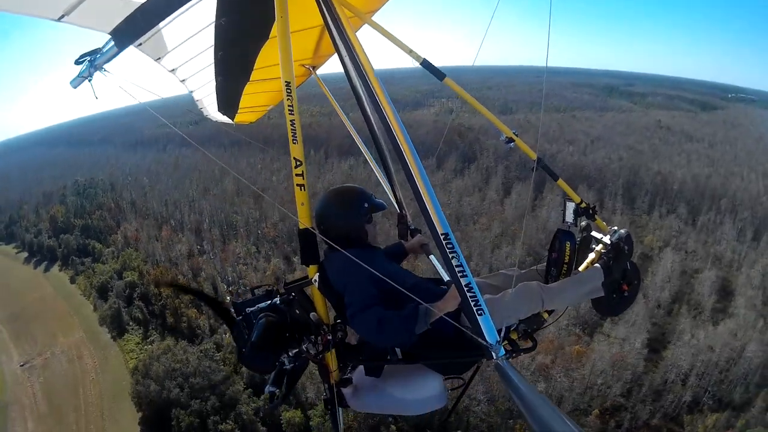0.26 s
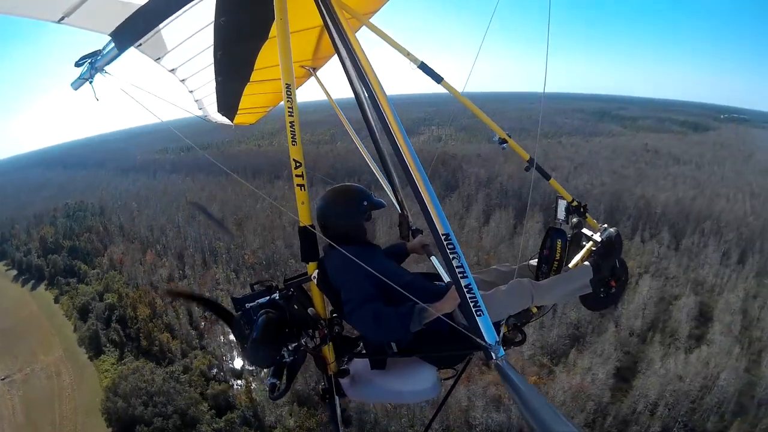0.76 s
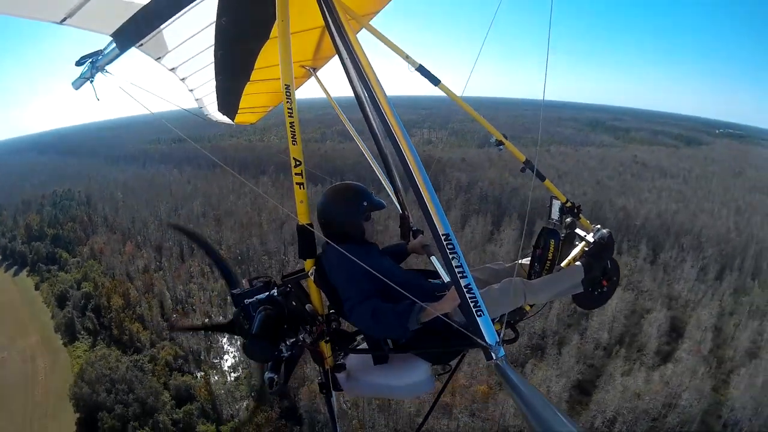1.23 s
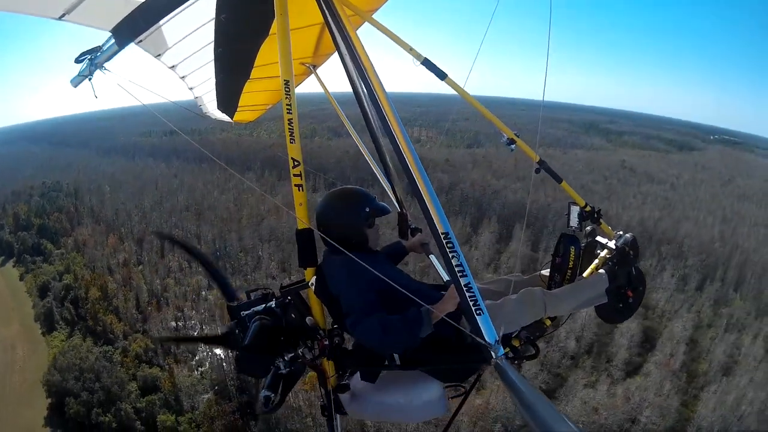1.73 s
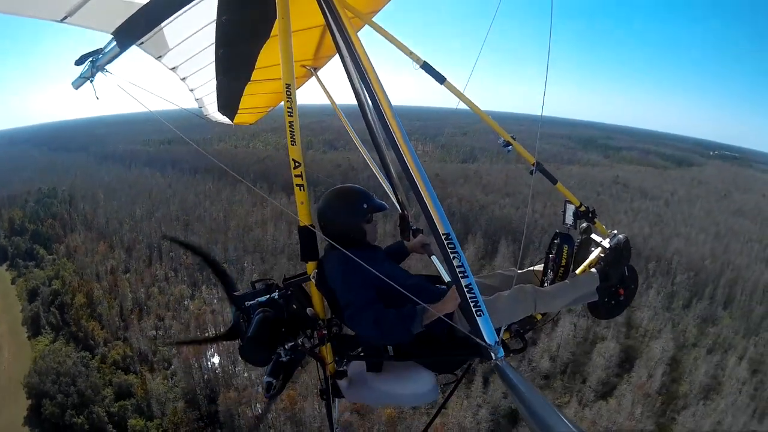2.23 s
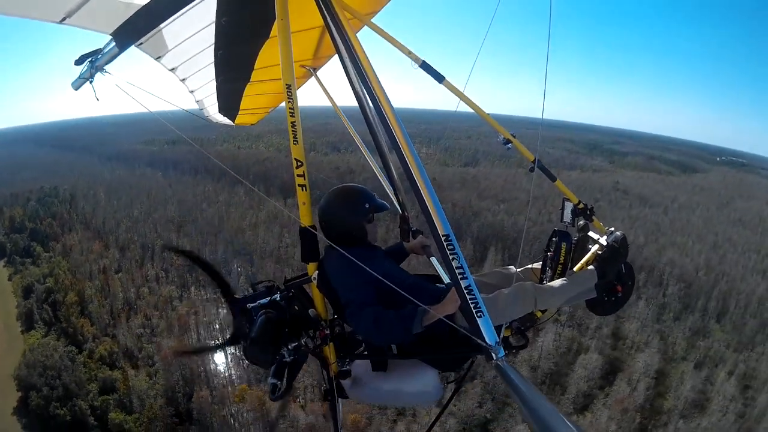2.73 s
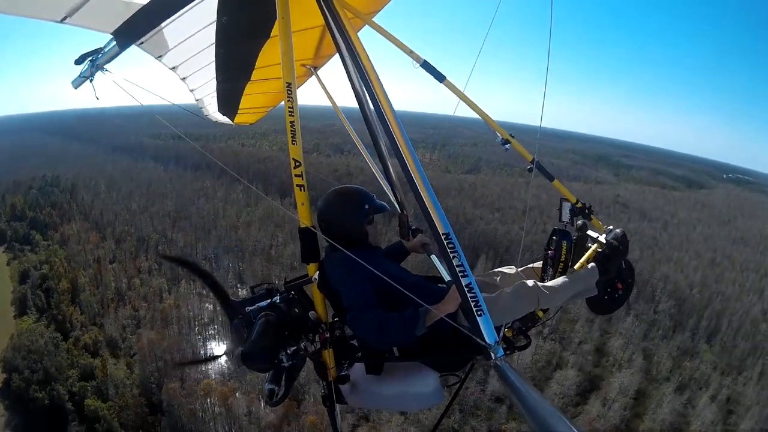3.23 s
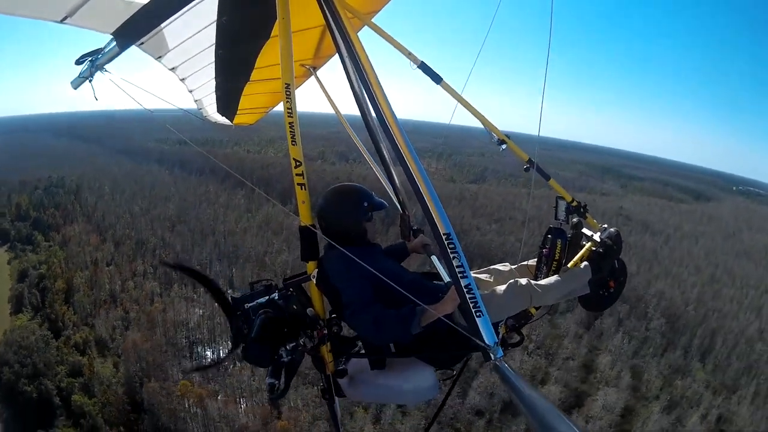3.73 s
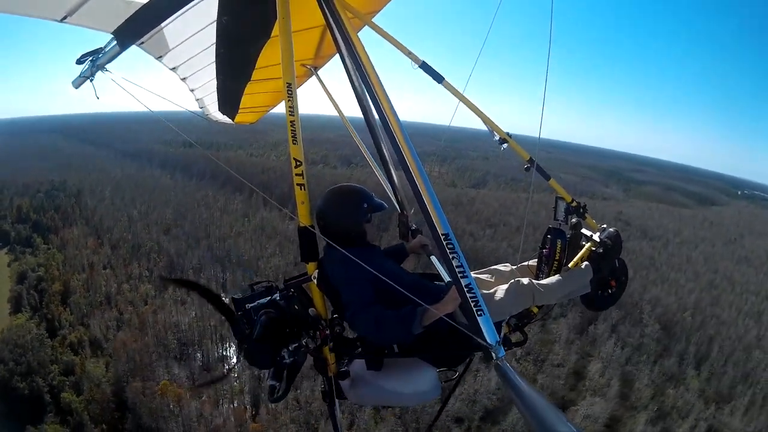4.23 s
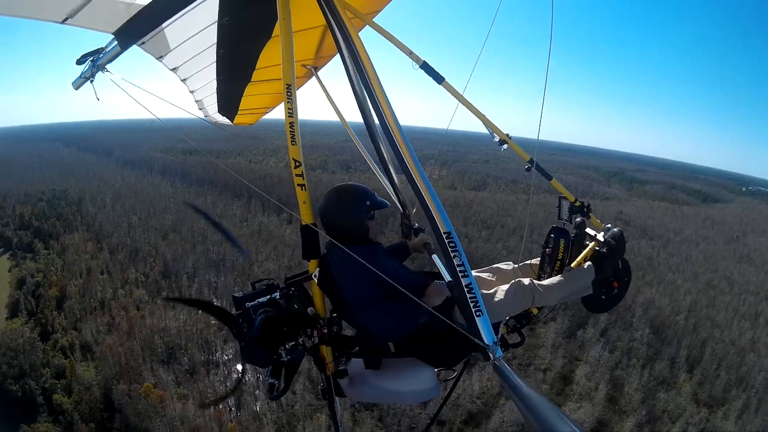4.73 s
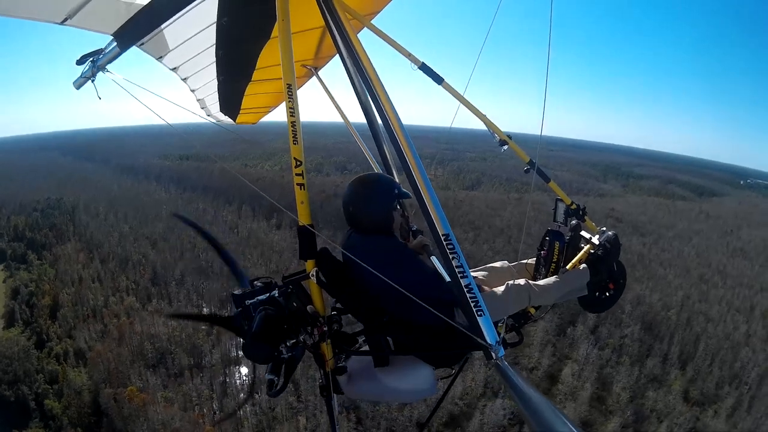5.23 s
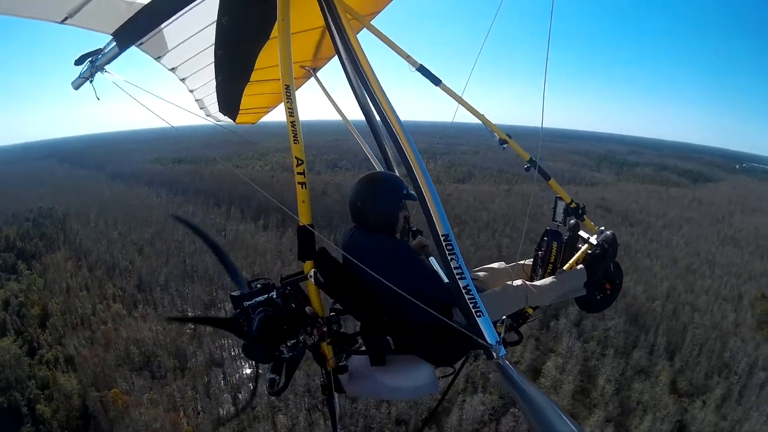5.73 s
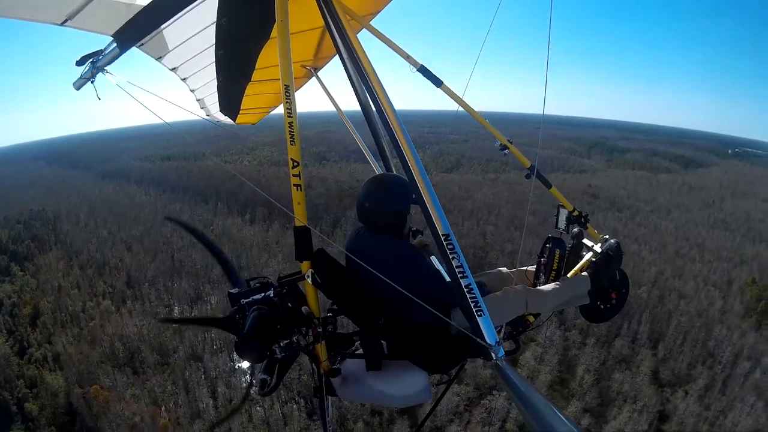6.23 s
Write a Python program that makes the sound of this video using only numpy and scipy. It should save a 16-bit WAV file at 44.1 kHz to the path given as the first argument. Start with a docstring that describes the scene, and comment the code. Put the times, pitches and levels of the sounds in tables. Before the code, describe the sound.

Aboard an open ultralight in cruise, the pusher propeller hums deep and steady with a buzzing engine drone and faint whine. Dense, gusty wind roars over an exposed microphone on the wing, flattening its loudest peaks, with a brief rising hoot and a few pops. A loose fitting nearby ticks and crackles irregularly throughout. The wind eases slightly towards the end.

```python
"""Out on the wing of a weight-shift ultralight in cruise, with the microphone open to the airstream.
The pusher propeller hums as blade-rate partials; the faster engine drones and whines as shaft harmonics.
Blades and engine add a throbbing rush; eddies on the port are shaped noise with gusts, pops and one hoot.
A loose fitting close by ticks and crackles: impulses make noise bursts that ring its resonances.
The input flattens the loud peaks, a faint steady noise floor lies under them, and the top rolls off."""
import sys
import numpy as np
from scipy import signal
from scipy.fft import rfft, irfft
from scipy.io import wavfile

SR = 44100
rng = np.random.default_rng(int(sys.argv[2]) if len(sys.argv) > 2 else 0)


def generate_wav(signal):
    """Clip the signal to [-1, 1] and save it as 16-bit WAV at the path in sys.argv[1]."""
    frames = np.transpose(np.atleast_2d(signal))
    scaled = np.clip(frames, -1, 1) * 32767
    pcm = np.round(scaled).astype(np.int16)
    wavfile.write(sys.argv[1], SR, pcm)


N = 285768

# weaker propeller overtones: multiple of the blade rate, level/dB
BLADE_OVERTONES = [(3, -27.5), (4, -40), (5, -39)]
# exhaust drone, then mechanical whine: multiple of the shaft rate, level/dB before flutter and sway
ENGINE_ORDERS = [(1, -16), (2, -17), (3, -35), (4, -38.5), (6, -52), (10, -51.5), (11, -42), (12, -47),
                 (13, -45), (14, -50.5), (15, -47.5), (16, -54.5), (17, -49.5), (20, -60), (21, -54.5),
                 (49, -67), (50, -63), (52, -73)]
# how the tones carry as the airframe sways: t/s, blade tone level/dB, octave level/dB, whine lift/dB
SWAY = [(0, -11, -6, -4), (0.6, -11.5, -14, 1), (0.85, -7, -15, 3.5), (1.5, -9.5, -8, 4),
        (2.4, -8.5, -17.5, 5), (3.4, -8.5, -12.5, 1.5), (4.7, -7.5, -10, 5.5), (5.3, -9.5, -9.5, 3),
        (6.48, -10.5, -14.5, 3.5)]
# colour of the blade and engine rush: f/Hz, relative density level/dB
RUSH_COLOUR = [(500, -2.5), (1200, 0), (1850, 1.5), (2500, -13.5), (3300, -9.5), (3800, -20), (5400, -19.5),
               (7800, -38), (10000, -29.5), (10800, -37.5), (11700, -26.5), (13500, -48.5), (16000, -55.5)]
# gusts as smooth swells: t/s at the height, full length/s, deep roar lift/dB, upper roar lift/dB
GUSTS = [(0.2, .45, 1, 3.5), (0.618, .4, 0, 1.5), (1.37, .3, 3, 0), (1.68, .25, -0.5, 1.5),
         (1.968, 0.2, 4.5, -0.5), (2.42, 0.23, 1.5, -2), (2.715, 0.36, .5, 5.5), (3.095, 0.58, 0.6, 5),
         (4.33, .25, 1.5, -1), (4.65, 0.14, 1.5, 2), (5.03, 0.79, 1.8, 1.5)]
# colour of the deep buffeting on the port: f/Hz, relative density level/dB
BUFFET_COLOUR = [(8, -20), (20, -13.5), (40, -11), (70, -3), (130, 0), (200, 2.5), (260, -3), (350, -10),
                 (550, -21), (800, -26.5), (1300, -34.5), (3000, -47), (8000, -63.5)]
# colour of the smaller eddies, the hollow upper roar: f/Hz, relative density level/dB
SMALL_EDDY_COLOUR = [(60, -31), (180, -7), (280, 5), (480, -3.5), (750, -10.5), (1200, -22.5), (3000, -42),
                     (8000, -69)]
# eddies that burst right on the port: t/s, relative level/dB
POPS = [(0.238, -14), (0.497, -18), (1.9415, -7), (4.646, -14), (5.958, -13)]
# colour of those bursts: f/Hz, relative density level/dB
POP_COLOUR = [(200, -14), (700, 10), (1500, 9), (3000, -14), (7000, -22), (12000, -33), (16000, -30)]
# ticks of the loose fitting: t/s, strike level/dB before the resonances
TICKS = [(0.023, -10), (0.076, -19), (0.6828, -15), (1.0269, -4.5), (1.334, -17), (1.381, -15),
         (1.557, -11.5), (1.7317, -13), (1.8327, -13.5), (1.9137, -10.5), (2.4927, -15), (2.772, -13),
         (3.7142, -13), (4.5291, -15.5), (4.5989, -15), (4.63, -9), (4.7462, -9.5), (5.009, -7.5),
         (5.458, -14), (5.5754, -17), (5.6241, -17), (5.724, -12.5), (5.8272, -19), (5.96, -10),
         (6.0756, -13)]
# resonances of the fitting: f/Hz, width/Hz, level/dB
FITTING_MODES = [(1980, 770, -2), (4080, 380, 1), (5400, 1000, -9.5), (8370, 1100, -20), (9720, 700, -16),
                 (12300, 2000, -33)]
# colour of the faint steady noise floor: f/Hz, relative density level/dB
FLOOR_COLOUR = [(1000, -10.5), (4000, 3), (8000, -6.5), (12000, -8), (16000, -26)]

BLADE_HZ, SHAFT_HZ = 97.9, 137.72       # mean blade-passing and engine shaft rates
# shares of the whine's swing in dB
WHISTLE_FOLLOWS, RUSH_FOLLOWS = 0.6, 0.15
# the airstream eases steadily, the deep and the hollow upper roar each at its own rate
ROAR_EASE_DB_PER_S, HOLLOW_EASE_DB_PER_S = 0.53, 0.9
HOOT_S, HOOT_LENGTH_S, HOOT_DB = 0.485, 0.13, -3.5      # centre, full length, level at the height
HOOT_HZ, HOOT_RISE_HZ_PER_S = 285.7, 1400               # pitch at the centre, and its climb
SHAKE_REST_DB, SHAKE_DB_PER_GUST_DB = -3.5, 3.5
SHAKE_LENGTH_S, SHAKE_NEAR_TICK_DB, SHAKE_FOLLOWS_TICK = 0.27, 6.5, 0.49   # last: dB per dB of tick
OVERLOAD, CUTOFF_HZ = 0.71, 15700       # input ceiling as amplitude, top edge of the recorder


def propeller(passes, blade_db=-0.05, octave_db=0.34, blade_flutter_db=0.5, octave_flutter_db=0.9,
              flutter_hz=4):
    """Each passing blade sends a pressure pulse: a deep hum and octave, both unsteady in the rough air."""
    blade_sway_db, octave_sway_db, _ = in_time(SWAY)
    blade_level_db = blade_sway_db + blade_db + blade_flutter_db * drift(flutter_hz)
    octave_level_db = octave_sway_db + octave_db + octave_flutter_db * drift(flutter_hz)
    partials = [(1, blade_level_db), (2, octave_level_db)] + list(BLADE_OVERTONES)
    return sum(from_db(db) * tone(round(k) * passes, waver=0.04, waver_hz=5) for k, db in partials)


def engine(turns, flutter_db=0.85, waver=0.2, waver_per_order=0.011, whistle_db=-0.5):
    """Shaft harmonics: the exhaust drones on the lowest, moving metal whines on the high ones."""
    *_, whine_db = in_time(SWAY)
    top_whistle_db = whistle_db + WHISTLE_FOLLOWS * whine_db
    out = np.zeros(N)
    for k, db in ENGINE_ORDERS:
        if k < 10:
            carry_db = 0
        elif k < 40:
            carry_db = whine_db
        else:
            carry_db = top_whistle_db
        # short waves are shaken more on their way through the air
        partial = tone(round(k) * turns, waver + waver_per_order * k, waver_hz=13.7)
        out += from_db(db + carry_db + flutter_db * drift(13)) * partial
    return out


def rush(turns, rush_db=-28.5, throb=0.063):
    """Broad noise of blades and engine, swelling once a shaft turn and partly carrying as the whine does."""
    *_, whine_db = in_time(SWAY)
    swell = 1 + throb * np.cos(2 * np.pi * turns)
    return from_db(rush_db + RUSH_FOLLOWS * whine_db) * swell * coloured_noise(RUSH_COLOUR)


def wind(gust_db, hollow_db, wind_db=-4.5, small_db=-16, small_depth=0.29, pop_db=-1, pop_s=0.0037):
    """Eddies break on the microphone port as a deep and a hollow roar; a few burst with a sharp pop."""
    roar = from_db(wind_db + gust_db) * coloured_noise(BUFFET_COLOUR)
    small_level_db = small_db + hollow_db + small_depth * gust_db
    small_eddies = from_db(small_level_db) * coloured_noise(SMALL_EDDY_COLOUR)
    pops = from_db(pop_db) * die_away(strikes(POPS), pop_s) * coloured_noise(POP_COLOUR)
    return roar + small_eddies + pops + hoot()


def hoot():
    """One gust sheds vortices across the port at a rising rate, swelling and fading as it climbs."""
    from_centre_s = np.clip(seconds() - HOOT_S, -HOOT_LENGTH_S / 2, HOOT_LENGTH_S / 2)
    pitch_hz = HOOT_HZ + HOOT_RISE_HZ_PER_S * from_centre_s
    whistle = tone(np.cumsum(pitch_hz) / SR, waver=0.45, waver_hz=23)
    return from_db(HOOT_DB) * hump(HOOT_S, HOOT_LENGTH_S) * whistle


def airstream(unrest_db=0.5, unrest_hz=3):
    """Deep and upper roar lifts in dB: steady easing and gusts, with random unrest in the deep one."""
    t = seconds()
    deep_db = sum(db * hump(s, length) for s, length, db, _ in GUSTS) - ROAR_EASE_DB_PER_S * t
    hollow_db = sum(db * hump(s, length) for s, length, _, db in GUSTS) - HOLLOW_EASE_DB_PER_S * t
    return deep_db + unrest_db * drift(unrest_hz), hollow_db


def fitting(gust_db, chatter_s=0.0034, bounce_s=0.014, bounce_db=-8, faint_per_s=85, faint_db=-20):
    """Ticks and their softer bounces chatter for milliseconds and ring; shaking adds a fine crackle."""
    crackle_hits = rng.random(N) < faint_per_s / SR
    crackle_db = faint_db + rng.uniform(-11.6, 4.72, N)
    faint = crackle_hits * shaking(gust_db) * from_db(crackle_db)
    # each bounce trails its tick by 0.5 to 1.5 times bounce_s
    bounces = [(s + bounce_s * (0.5 + rng.random()), db + bounce_db) for s, db in TICKS]
    loud = strikes(TICKS) + strikes(bounces)
    envelope = die_away(loud, chatter_s) + die_away(faint, decay_s=0.0013)
    chatter = envelope * rng.standard_normal(N)
    out = np.zeros(N)
    for k, (hz, width_hz, db) in enumerate(FITTING_MODES):
        out += (-1) ** k * from_db(db) * resonance(chatter, hz, width_hz)   # alternate polarity
    return out


def shaking(gust_db):
    """How hard the fitting is shaken, as a gain: more around strong ticks and in gusts."""
    near_ticks = np.zeros(N)
    for s, db in TICKS:
        near_db = SHAKE_NEAR_TICK_DB + SHAKE_FOLLOWS_TICK * db
        near_ticks += from_db(near_db) ** 2 * hump(s, SHAKE_LENGTH_S)
    in_gusts = from_db(SHAKE_REST_DB + SHAKE_DB_PER_GUST_DB * gust_db) ** 2
    return np.sqrt(near_ticks + in_gusts)


def tone(turns, waver, waver_hz):
    """A partial of rms 1; turbulent air on its way shakes its phase by waver radians rms."""
    start = rng.random()
    return np.sqrt(2) * np.sin(2 * np.pi * (turns + start) + waver * drift(waver_hz))


def drift(rate_hz):
    """Smooth random wandering of spread 1: noise through a two-pole low-pass, at a 40th of the rate."""
    pole = np.exp(-2 * np.pi * rate_hz * 40 / SR)
    noise = rng.standard_normal(N // 40 + 2002)
    slow = signal.lfilter([1], [1, -2 * pole, pole * pole], noise)[2000:]   # drop the settling
    return np.interp(np.arange(N) / 40, np.arange(len(slow)), rms_one(slow))


def coloured_noise(spectrum):
    """Noise of rms 1 with the given spectrum, joined in dB over log frequency."""
    hz, db = np.transpose(spectrum)
    bins_hz = np.maximum(np.fft.rfftfreq(N, 1 / SR), 1)
    gain = from_db(np.interp(np.log(bins_hz), np.log(hz), db))
    return rms_one(irfft(rfft(rng.standard_normal(N)) * gain, N))


def resonance(x, hz, width_hz):
    """Two-pole resonance with gain 1 on top."""
    r = np.exp(-np.pi * width_hz / SR)
    feedback = [1, -2 * r * np.cos(2 * np.pi * hz / SR), r * r]
    return signal.lfilter(np.array([1, 0, -1]) * (1 - r * r) / 2, feedback, x + 1e-18)


def strikes(rows):
    """One impulse for each row of t/s, level/dB."""
    out = np.zeros(N)
    for s, db in rows:
        out[round(s * SR)] += from_db(db)
    return out


def die_away(impulses, decay_s):
    """Each impulse becomes an exponentially fading envelope."""
    return signal.lfilter([1], [1, -np.exp(-1 / (decay_s * SR))], impulses + 1e-18)


def hump(at_s, length_s):
    """A smooth rise and fall of height 1, centred on a moment."""
    return np.cos(np.pi * np.clip((seconds() - at_s) / length_s, -0.5, 0.5)) ** 2


def in_time(rows):
    """Each column of a curve, at every sample."""
    s, *columns = np.transpose(rows)
    return [np.interp(seconds(), s, column) for column in columns]


def seconds():
    """The time of every sample."""
    return np.arange(N) / SR


def from_db(db):
    """Decibels to gain."""
    return 10 ** (np.asarray(db) / 20)


def rms_one(x):
    """Scale to rms 1."""
    return x / np.sqrt(np.mean(x ** 2) + 1e-20)


def scene(speed_wander=0.000544):
    """Engine and propeller are geared together, so one slightly wandering speed drives both."""
    clock_s = np.cumsum(1 + speed_wander * drift(0.525)) / SR
    passes, turns = BLADE_HZ * clock_s, SHAFT_HZ * clock_s
    gust_db, hollow_db = airstream()
    machine = propeller(passes) + engine(turns) + rush(turns)
    return (machine + wind(gust_db, hollow_db) + fitting(gust_db))[None]


def record(dry, knee=14, floor_db=-53, dull_hz=13000):
    """Overload makes flat tops with barely rounded corners; a faint noise floor lies under; the top is cut."""
    clipped = dry / (1 + np.abs(dry / OVERLOAD) ** knee) ** (1 / knee)
    noisy = clipped + from_db(floor_db) * coloured_noise(FLOOR_COLOUR)
    roll_off = signal.butter(2, dull_hz, fs=SR, output="sos")
    first = noisy[:, :1]
    dulled = signal.sosfilt(roll_off, noisy - first) + first      # the filter starts settled
    steep_cut = signal.ellip(10, 0.05, 60, CUTOFF_HZ, fs=SR, output="sos")
    return signal.sosfiltfilt(steep_cut, dulled)


dry = scene()
out = record(dry)
generate_wav(out)
```